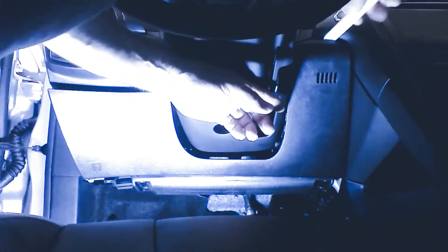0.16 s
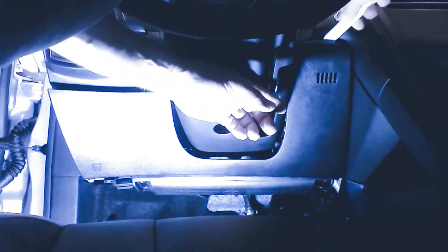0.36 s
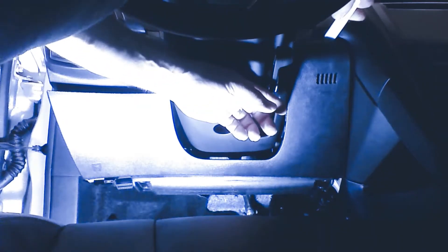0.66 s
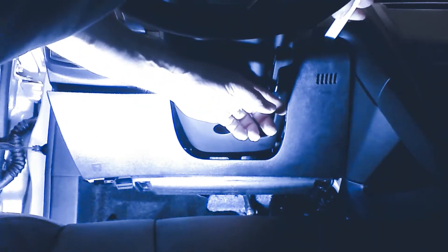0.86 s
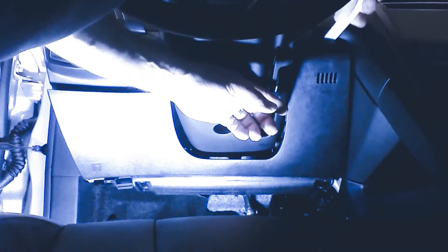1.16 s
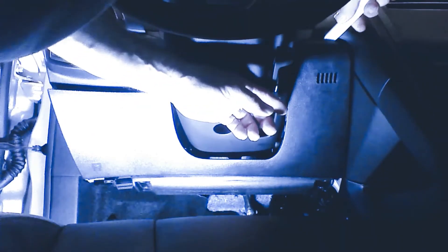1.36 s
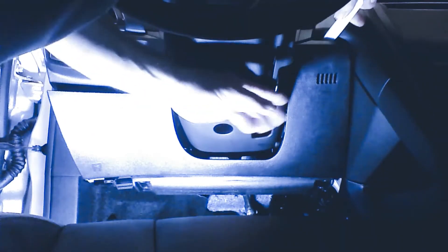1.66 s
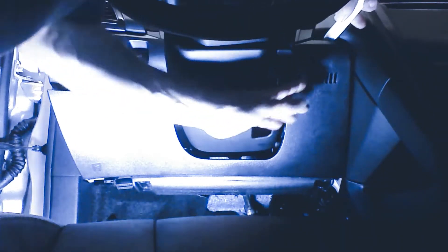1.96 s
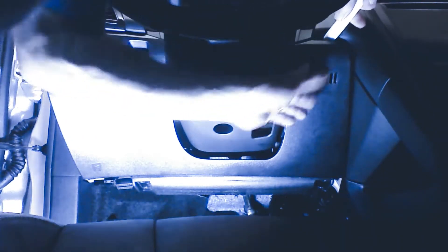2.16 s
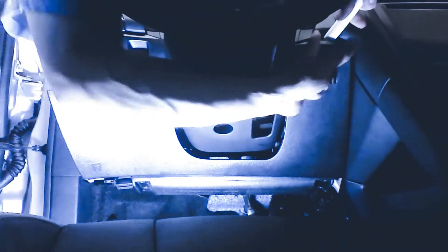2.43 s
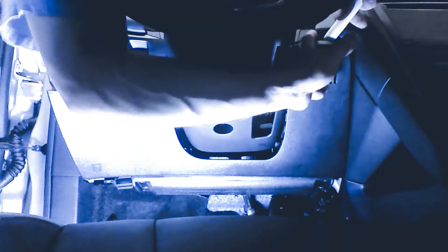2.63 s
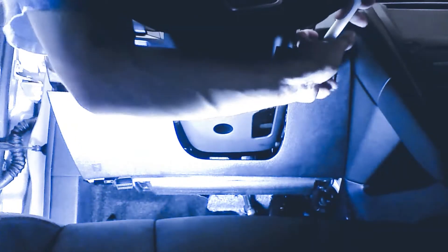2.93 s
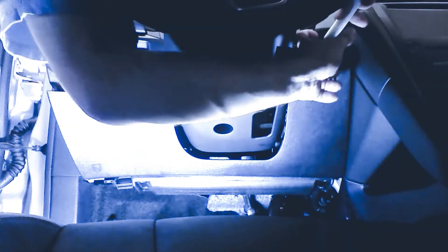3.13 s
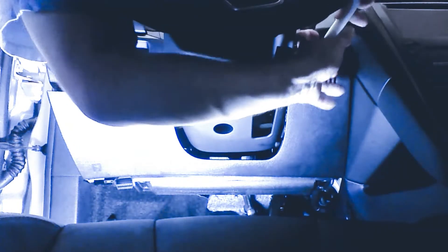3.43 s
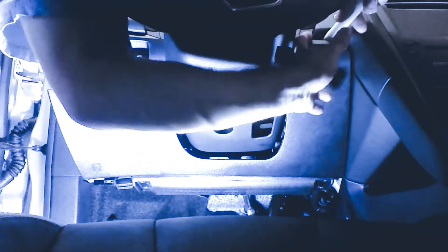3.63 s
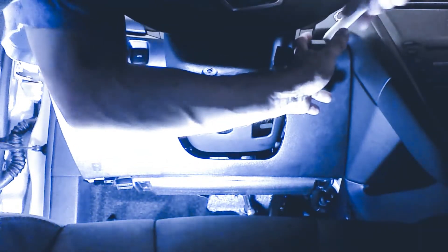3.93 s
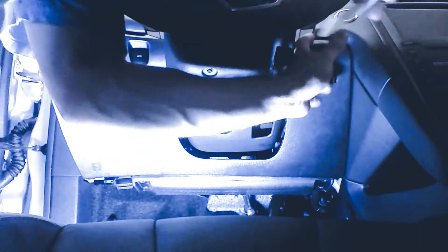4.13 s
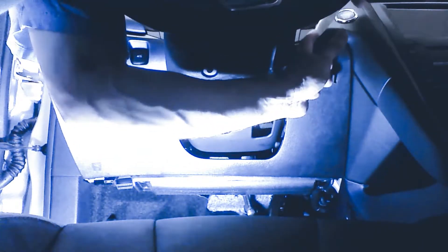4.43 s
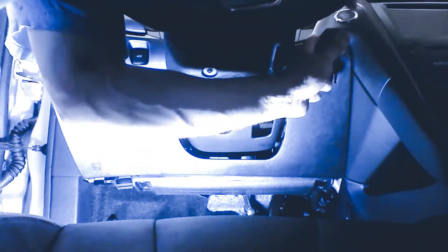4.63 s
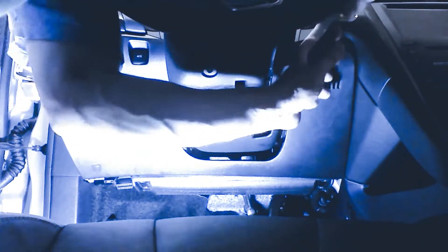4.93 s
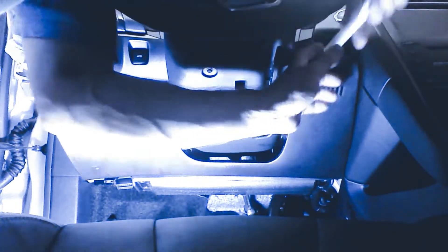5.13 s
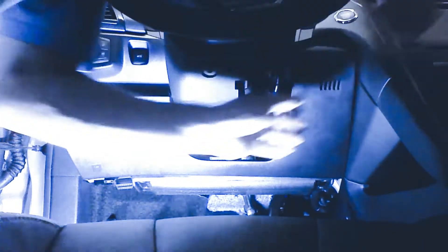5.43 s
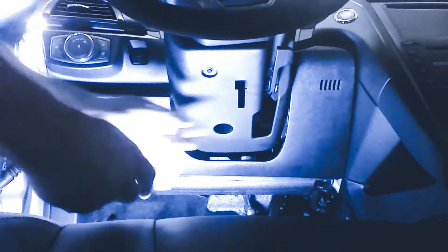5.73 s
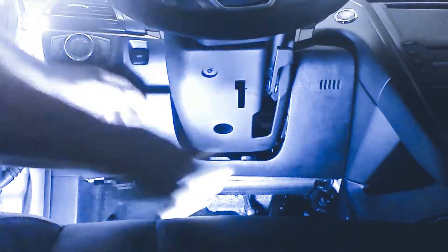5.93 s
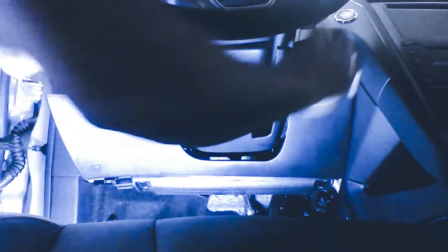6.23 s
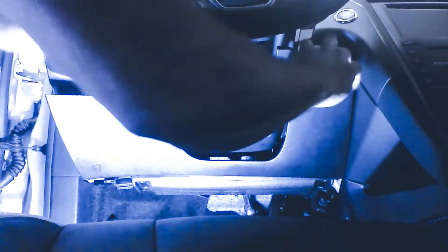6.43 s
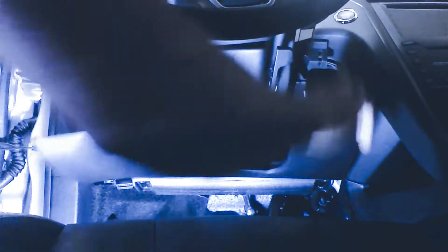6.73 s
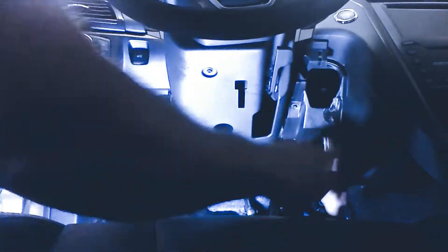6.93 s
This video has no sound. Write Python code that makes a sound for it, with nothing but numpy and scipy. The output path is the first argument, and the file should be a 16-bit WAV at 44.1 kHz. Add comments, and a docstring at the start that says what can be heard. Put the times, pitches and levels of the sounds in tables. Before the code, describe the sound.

Close up inside a still car, three sharp plastic pops are spaced between faint scrapes and knocks, with a crisp click and swish near the end.

```python
"""Snaps, ticks and rubs of a plastic dashboard panel being pried off inside a quiet car, heard close by.
Spring clips and knocks are impacts: a decaying noise crack plus the decaying sine modes of the panel.
The tool ticks and rubs in the gap, then clatters and slides: rubs are stick-slip grains, slides rough noise.
The padded cabin adds a short tail and a low boom to each blow, over faint rumble and hiss of filtered noise."""
import sys
import numpy as np
from scipy import signal
from scipy.fft import rfft, irfft, next_fast_len
from scipy.io import wavfile
from scipy.ndimage import uniform_filter1d, map_coordinates

SR = 44100
rng = np.random.default_rng(int(sys.argv[2]) if len(sys.argv) > 2 else 0)


def int16_out(signal):
    """Quantize to a 16-bit WAV file."""
    q = np.round(np.clip(np.atleast_2d(signal).T, -1, 1) * 32767)
    wavfile.write(sys.argv[1], SR, q.astype(np.int16))


N = 312228
TIME = np.arange(N) / SR
RING_SIZE = 16384  # samples in one blow
BAND_HZ = 80 * 2 ** (np.arange(24) / 3)  # third-octave centres
# delay by which sound reaches the left port late, and the likeness of the two ports
PORT_LAG_S, WIDE_HZ, BASS_LIKENESS = 0.0001, 2600, 0.58

# centres of the five zones in which a blow's level is given: thud, knock, clack, crack, tick [hz]
ZONE_HZ = [150, 480, 1300, 4200, 11000]
# early echoes from the footwell and the steering column: [delay_s, share]
ECHOES = [(.0016, 0.13), (.0034, 0.34), (.0059, .35)]
# the blade tapping in the gap: [start_s, level_db, hardness_db_per_octave, pitch_hz]
TAPS = [(1.285, -50.5, -8.5, 332), (1.445, -51.5, 4, 2330), (1.726, -44.5, -23, 403),
        (2.097, -46, -0.5, 525), (2.245, -41.5, -5.5, 460), (2.754, -41.5, -3.5, 1190),
        (3.592, -51, -15, 260), (3.629, -54.5, 6, 890), (3.902, -41, -3, 1440), (4.152, -49.5, 0.5, 397),
        (4.174, -39, -3, 435), (4.622, -49.5, 3, 1350), (4.711, -45, 4.5, 920), (4.716, -35.5, 1, 583),
        (4.763, -38.5, -5, 555), (5.922, -48, 5.5, 560)]
# the hand bumping the panel, and the freed panel knocking back: [start_s, level_db, pitch_hz]
BUMPS = [(0.434, -23, 234), (0.453, -43, 570), (1.028, -60, 520), (1.696, -47, 85), (2.274, -39.5, 548),
         (2.359, -47.5, 475), (2.527, -49.5, 528), (2.755, -44.5, 172), (2.994, -48, 490),
         (3.046, -49, 280), (3.242, -54.5, 250), (3.509, -50, 250), (4.424, -40, 530), (4.45, -61, 80),
         (5.8733, -43, 650), (5.934, -43, 453), (6.146, -42.5, 230), (6.172, -46.5, 168),
         (6.45, -55.5, 265), (6.652, -40.5, 407)]


def amp(db):
    """Logarithmic level: decibels become an amplitude gain."""
    return 10 ** (np.asarray(db) / 20)


def unit(x):
    """Normalisation by power: scale to rms 1."""
    return x / np.sqrt(np.mean(x ** 2))


def over_hz(hz, table):
    """Log-frequency interpolation of each column after the first."""
    points, *columns = np.transpose(table)
    log_hz = np.log(hz + 1e-6)
    return [np.interp(log_hz, np.log(points), column) for column in columns]


def add(out, start_s, sound):
    """Superposition: sum a sound into the mix at a given time."""
    start = int(start_s * SR)
    out[:, start:start + sound.shape[1]] += sound[:, :N - start]


def port_noise(size, echoes):
    """Spatial coherence: noise spectra at two ports, alike in the bass and unrelated in the treble."""
    hz = np.fft.rfftfreq(size, 1 / SR)
    comb = 1 + sum(share * np.exp(-2j * np.pi * hz * delay_s) for delay_s, share in echoes)
    mid, side = rfft(rng.standard_normal((2, size))) * comb
    alike = BASS_LIKENESS / (1 + (hz / WIDE_HZ) ** 2)
    mid = mid * np.sqrt(1 + alike)
    side = side * np.sqrt(1 - alike)
    late = np.exp(-2j * np.pi * hz * PORT_LAG_S)
    return hz, np.array([(mid + side) * late, mid - side])


def noise(colour, echoes=()):
    """Spectral shaping: stereo noise of a given colour, rms 1."""
    hz, spectra = port_noise(next_fast_len(N, True), echoes)
    gain = amp(over_hz(hz, colour)[0])
    return unit(irfft(spectra * gain)[:, :N])


def walk(rate_hz):
    """Band-limited fluctuation: random levels held for 1 / rate_hz and smoothed, rms 1."""
    hold = int(SR / rate_hz)
    steps = np.repeat(rng.standard_normal(N // hold + 1), hold)
    return unit(uniform_filter1d(steps, hold)[:N])


def swell(peak_s, half_s):
    """Stroke envelope: friction rises to a peak and falls again, down to 1/e at half_s either side."""
    distance = np.minimum(np.abs((TIME - peak_s) / half_s), 20).astype(np.float32)
    return np.exp(-distance ** 0.84)


def from_right(sound, lag_s):
    """Interaural-style time difference: delay the left port."""
    left = map_coordinates(sound[0], [(TIME - lag_s) * SR], mode="nearest")
    return np.array([left, sound[1]])


def third_octaves():
    """Filter bank: a stock of stereo noise in power-complementary third-octave bands."""
    hz, spectra = port_noise(4 * RING_SIZE, ECHOES)
    distance = np.minimum(np.abs(np.log2((hz + 1e-6) / BAND_HZ[:, None])) * 3, 1)
    weights = np.cos(np.pi / 2 * distance)
    return irfft(spectra * weights[:, None]).astype(np.float32)


def fade(t, t60):
    """Exponential damping: one decay for each t60, the time in seconds to fall by 60 dB."""
    return np.exp(np.outer(-np.log(1000) / t60, t).astype(np.float32))


def blow(stock, zones_db, own_modes, ring, pan_db, rise_s, sharp_db, modes_db, dense_db, drag_s=0):
    """Modal impact: a dense crack and discrete damped modes, both coloured by the contact spectrum."""
    # modes of the panel, t60 before the ring factor: [pitch_hz, level_db, t60_s]
    panel_modes = [(118.2, 3, 0.41), (182.6, 5.5, 0.23), (236.3, 3, 0.25), (360, 2, 0.021), (389, 4, 0.17),
                   (448.4, 5.5, 0.11), (574.6, -2.5, 0.075), (561, 3, 0.16), (641, -4.5, 0.009),
                   (782, -2, 0.0077), (1033, 2, 0.11), (1200, -17, 0.02), (1479, 11.5, 0.029),
                   (1687, -1, 0.17), (2263, 3, 0.043), (2860, -27, 0.1), (4304, 5, 0.041),
                   (3926, -6.5, 0.063), (4860, 1, 0.12), (4800, -45, 0.1), (6720, -26, 0.23),
                   (7850, -2, 0.18)]
    # dense overlapping modes of the plastic, t60 before the ring factor: [band_hz, level_db, t60_s]
    plastic = [(80, -6.5, 0.23), (174, -14.5, 0.58), (450, -16, 0.032), (746, -7, 0.077), (1620, -7, 0.11),
               (2140, -14, 0.21), (3140, -7.5, 0.1), (4170, -9.5, 0.13), (7400, -2.5, 0.087),
               (10700, -9.5, 0.065), (16000, -17.5, 0.11)]
    # the cabin's tail relative to the blow: [band_hz, level_db, t60_s]
    cabin = [(80, 1.5, 0.42), (262, -31, 0.38), (1000, -31, 0.52), (3900, -34.5, 1), (14000, -25, 0.36)]
    t = np.arange(RING_SIZE) / SR
    free = np.maximum(t - drag_s, 0)  # the ring decays once the contact has let go
    attack = np.minimum(t / rise_s, 1).astype(np.float32)
    reference = 0.02 * SR  # energy of 20 ms of rms-1 sound
    contact = list(zip(ZONE_HZ, zones_db))

    # the crack: each band starts with a sharp spike, decays at its own rate, then lingers in the cabin
    db, t60 = over_hz(BAND_HZ, plastic)
    tail_db, tail_t60 = over_hz(BAND_HZ, cabin)
    spike = float(amp(sharp_db)) * fade(free, t60 * ring / 4)
    tail = amp(tail_db)[:, None].astype(np.float32) * fade(t, tail_t60)
    shape = spike + fade(free, t60 * ring) + tail
    start = rng.integers(3 * RING_SIZE)
    bands = stock[:, :, start:start + RING_SIZE] * (shape * attack)[:, None]
    energy = np.einsum("bct,bct->b", bands, bands) / 2  # mean of the two ports
    band_db = over_hz(BAND_HZ, contact)[0] + db + dense_db
    size = amp(band_db) * np.sqrt(reference / energy)
    dense = np.einsum("b,bct->ct", size.astype(np.float32), bands)

    # the ring: neighbouring modes swing in opposite directions, and the grip detunes them slightly
    panel = [(hz, db + modes_db, t60) for hz, db, t60 in panel_modes]
    hz, db, t60 = np.transpose(panel + own_modes)
    hz = hz * (1 + 0.0057 * rng.standard_normal(len(hz)))
    shape = fade(free, t60 * ring)
    size = amp(over_hz(hz, contact)[0] + db) * np.sqrt(2 * reference / np.sum(shape ** 2, axis=1))
    size = size * (-1) ** np.arange(len(hz))
    # a mode reaches the left port up to a quarter cycle late
    apart = np.minimum(2 * np.pi * hz * PORT_LAG_S, np.pi / 2)[:, None]
    modes = []
    for late in (apart, 0):
        swing = np.sin((np.outer(2 * np.pi * hz, t) - late).astype(np.float32))
        modes.append(np.einsum("m,mt->t", size.astype(np.float32), shape * swing))
    return (dense + np.array(modes) * attack) * amp([[pan_db / 2], [-pan_db / 2]])


def background():
    """Damped rocking and broadband noise: the car sways, more after each pull, under still air and hiss."""
    # pulls that set the car body rocking: [start_s, level_db, t60_s]
    pulls = [(0.43, -46, 0.37), (4.67, -48.5, 6.6), (5.981, -49.5, 1.4), (6.66, -51, 3.6)]
    # spectrum of the sway: [frequency_hz, relative_level_db]
    sway_colour = [(15, 0.5), (33, 2.5), (55, -2.5), (90, -27), (150, -21), (300, -37.5)]
    # spectrum of still cabin air and microphone hiss: [frequency_hz, relative_level_db]
    floor_colour = [(30, -40), (60, -6.5), (120, -11), (400, -13), (1000, -22.5), (2500, -25.5),
                    (4800, -26.5), (5900, -24.5), (6900, -14.5), (7900, -24), (9600, -20), (12500, -29),
                    (14500, -23), (16000, -36)]
    rest_db, rise_s, floor_db = -55.5, 0.019, -59
    rocking = amp(rest_db)
    for start_s, db, t60 in pulls:
        since = np.maximum(TIME - start_s, 0)
        build_up = np.minimum(since / rise_s, 1)
        rocking = rocking + amp(db) * build_up * np.exp(-np.log(1000) * since / t60)
    sway = noise(sway_colour)
    sway = unit(sway + 1.2 * sway.mean(axis=0))  # such long waves reach both ports more alike
    return sway * rocking + noise(floor_colour) * amp(floor_db)


def rubbing(slips_per_s=260, slip_s=0.0018, spread_db=4, smooth=0.72):
    """Stick-slip friction: skin and blade slip at random, each slip a tiny burst that dies in milliseconds."""
    # longer strokes of hand and tool over the trim, and the panel creaking under strain just before the first
    # two snaps: [peak_s, half_s, level_db, hiss_relative_db]
    rubs = [(0.053, 0.02, -45.5, -10.5), (0.246, 0.015, -48, -5), (0.399, 0.048, -56, -5),
            (1.127, .01, -64.5, 10), (1.305, 0.05, -57.5, -21), (1.705, 0.05, -51, -1.5),
            (2.145, 0.043, -50, -7.5), (2.27, 0.026, -42, -13.5), (2.44, 0.044, -51, -1),
            (3.87, 0.13, -54.5, 1), (4.539, 0.05, -53.5, -9.5), (4.64, 0.028, -52, -26),
            (4.96, 0.017, -44.5, -13), (4.988, 0.0034, -35, 2), (5.09, 0.016, -49, -28),
            (5.215, 0.061, -47.5, -1.5), (5.532, 0.025, -48, -4), (5.95, 0.074, -41.5, -8),
            (6.135, 0.021, -46, 4), (6.672, 0.036, -41.5, -8)]
    # dull part of the rub: [frequency_hz, relative_level_db]
    body_colour = [(100, 7), (250, -5), (520, -1), (850, -6.5), (1500, -3.5), (2200, -15), (5000, -36)]
    # bright part of the rub: [frequency_hz, relative_level_db]
    hiss_colour = [(1200, 2), (2400, 5.5), (4500, -2.5), (8000, -0.5), (16000, -11)]
    # the blade scuffs on after every tap, 7 dB below it, with hiss 11 dB below the scuff
    scuffs = [(start_s + 0.013, 0.022, db - 7, -11) for start_s, db, *_ in TAPS]
    # skin brushes the panel around every bump, 22 dB below it and without hiss
    body = sum(amp(db - 22) * swell(start_s, 0.019) for start_s, db, _ in BUMPS)
    hiss = 0
    for peak_s, half_s, db, hiss_db in rubs + scuffs:
        stroke = amp(db) * swell(peak_s, half_s)
        body = body + stroke
        hiss = hiss + amp(hiss_db) * stroke
    slip_sizes = amp(spread_db * np.clip(rng.standard_normal(N), -2, 2))
    slips = (rng.random(N) < slips_per_s / SR) * slip_sizes
    bursts = unit(signal.lfilter([1], [1, -np.exp(-1 / (slip_s * SR))], slips))
    grain = unit(smooth + bursts)
    return grain * (noise(body_colour, ECHOES) * body + noise(hiss_colour, ECHOES) * hiss)


def clips(stock):
    """Release of stored strain: each clip drags for milliseconds, twangs and flings the panel free."""
    # clips letting go: [start_s, thud_db, knock_db, clack_db, crack_db, tick_db, lower_panel_pitch_hz,
    # upper_panel_pitch_hz, clip_pitch_hz, clip_ring_db, drag_s, ring_factor, left_minus_right_db]
    snaps = [(0.4221, -23.5, -26.5, -31, -28.5, -29.5, 344, 608.5, 5640, -0.5, 0.0058, 0.47, 0),
             (4.6574, -23.5, -15.5, -21.5, -23, -22, 247.4, 353, 4900, -7, 0.0064, 0.75, -1),
             (6.597, -33.5, -21.5, -22, -20.5, -27, 851, 1063, 3970, -11, 0.0015, 0.6, 0.5)]
    out = np.zeros((2, N))
    for start_s, *zones_db, lower_hz, upper_hz, clip_hz, clip_db, drag_s, ring, pan_db in snaps:
        # the loosened span of panel swings in two modes, the small stiff clip in one
        own_modes = [(lower_hz, -1, 0.075), (upper_hz, -1, 0.075), (clip_hz, clip_db, 0.018)]
        snap = blow(stock, zones_db, own_modes, ring, pan_db, rise_s=0.00022, drag_s=drag_s,
                    sharp_db=-24.5, modes_db=-15.5, dense_db=-4.5)
        add(out, start_s, snap)
    return out


def bumps(stock, ring=0.85):
    """Soft-contact impact: dull knocks of the hand, each ringing the span of panel that it meets."""
    # relative level in each of the five zones [db]
    soft_contact = [-3.5, 0, -13, -22, -25]
    out = np.zeros((2, N))
    for start_s, db, pitch_hz in BUMPS:
        zones_db = db + np.array(soft_contact)
        knock = blow(stock, zones_db, [(pitch_hz, -2, 0.06)], ring, pan_db=-0.5, rise_s=0.0015,
                     sharp_db=-7, modes_db=-14.5, dense_db=-6)
        add(out, start_s, knock)
    return out


def taps(stock, ring=0.68):
    """Contact stiffness: the blade knocks along the gap, a harder contact reaching further into the treble."""
    # relative level in each of the five zones before hardness [db]
    blade_contact = [-12.5, 2.5, 3, -7, -5]
    out = np.zeros((2, N))
    octaves = np.maximum(np.log2(np.array(ZONE_HZ) / ZONE_HZ[2]), 0)  # above the clack zone
    for start_s, db, hardness, pitch_hz in TAPS:
        zones_db = db + np.array(blade_contact) + hardness * octaves
        tap = blow(stock, zones_db, [(pitch_hz, -2, 0.06)], ring, pan_db=-0.5, rise_s=0.00031,
                   sharp_db=-30, modes_db=-12.5, dense_db=-7)
        add(out, start_s, tap)
    return out


def clatter(stock, ring=0.57):
    """Hard-contact impact: sharp clicks of the tool slipping out and landing on hard trim."""
    # the hard tool clicking against trim:
    # [start_s, body_db, crack_db, tick_db, pitch_hz, left_minus_right_db]
    clicks = [(4.992, -34, -25, -44, 1410, -2), (5.1706, -42.5, -48, -35, 7050, -2.5),
              (5.232, -49.5, -50, -39.5, 6800, -1), (5.8874, -32.5, -35.5, -31, 675, -2),
              (5.994, -48, -43, -39, 211, 4), (6.0001, -35, -27.5, -17.5, 7240, 0)]
    # relative level of the body in the thud, knock and clack zones [db]
    body_contact = [-6, 0, 0]
    out = np.zeros((2, N))
    for start_s, body_db, crack_db, tick_db, pitch_hz, pan_db in clicks:
        zones_db = [*(body_db + np.array(body_contact)), crack_db, tick_db]
        click = blow(stock, zones_db, [(pitch_hz, -2, 0.04)], ring, pan_db, rise_s=0.0001,
                     sharp_db=-27, modes_db=-15, dense_db=-4)
        add(out, start_s, click)
    return out


def slides(rough_db=1.0):
    """Sliding friction: gritty swishes whose level follows blade speed and the roughness of grained plastic."""
    # the blade skidding: [fastest_s, half_s, level_db]
    skids = [(5.193, 0.011, -39), (5.249, 0.0046, -37.5), (5.329, 0.028, -46.5), (6.059, 0.0064, -20.5),
             (6.087, 0.0076, -30.5)]
    # spectrum of the skid: [frequency_hz, relative_level_db]
    skid_colour = [(300, -29), (1500, -18), (2600, -18.5), (3300, -11), (6000, -5.5), (9700, -4.5),
                   (12000, -4.5), (16000, -13.5)]
    speed = sum(amp(db) * swell(fastest_s, half_s) for fastest_s, half_s, db in skids)
    roughness = amp(rough_db * walk(660))
    return noise(skid_colour, ECHOES) * speed * roughness


def scene():
    """Linear superposition of everything heard from the driver's seat."""
    stock = third_octaves()
    # the gap lies to the right: its sounds reach the left port later still
    prying = from_right(taps(stock) + bumps(stock) + rubbing(), lag_s=0.00014)
    return clips(stock) + prying + clatter(stock) + slides() + background()


def record(dry):
    """Soft saturation and band limiting: the camera rounds the loudest peaks and cuts the top."""
    ceiling, top_hz = 0.52, 16100
    rounded = ceiling * np.tanh(dry / ceiling)
    low_pass = signal.ellip(10, 0.2, 80, top_hz, fs=SR, output="sos")
    return signal.sosfilt(low_pass, rounded)


dry = scene()
out = record(dry)
int16_out(out)
```